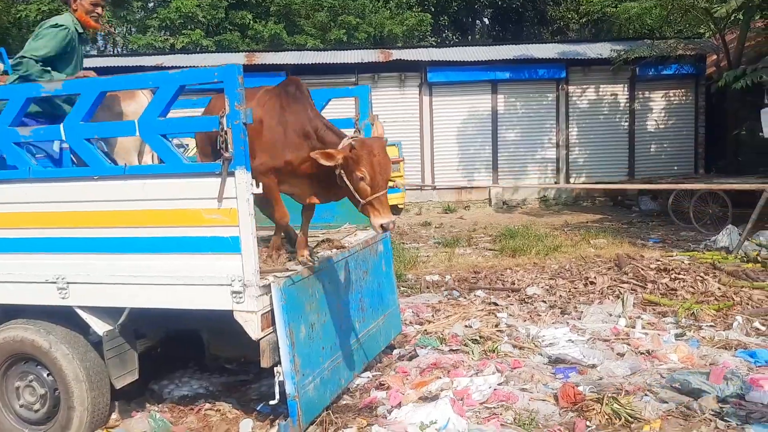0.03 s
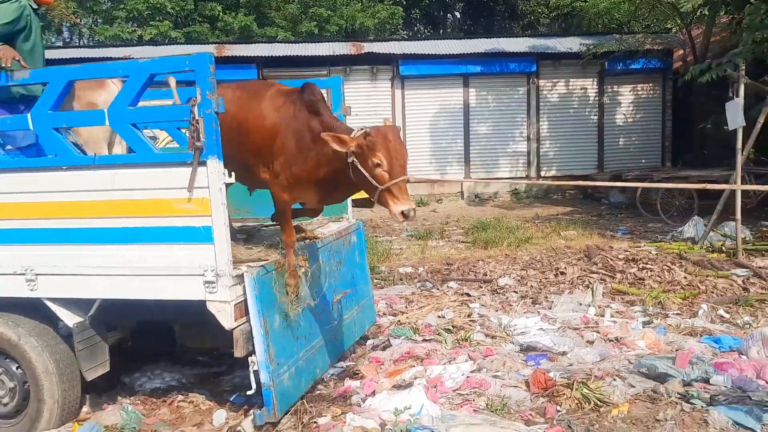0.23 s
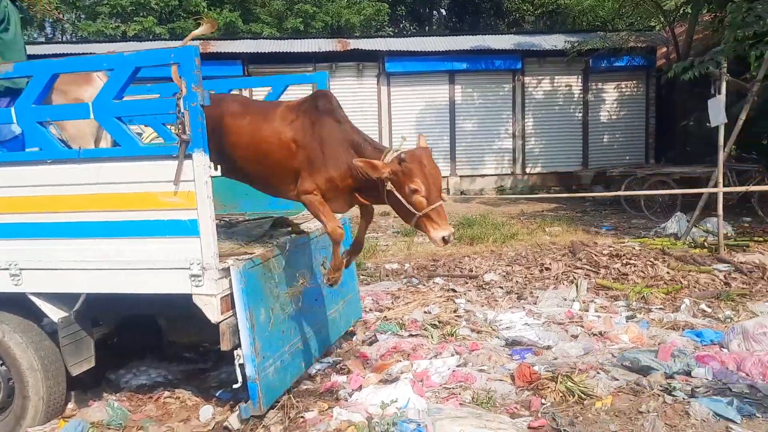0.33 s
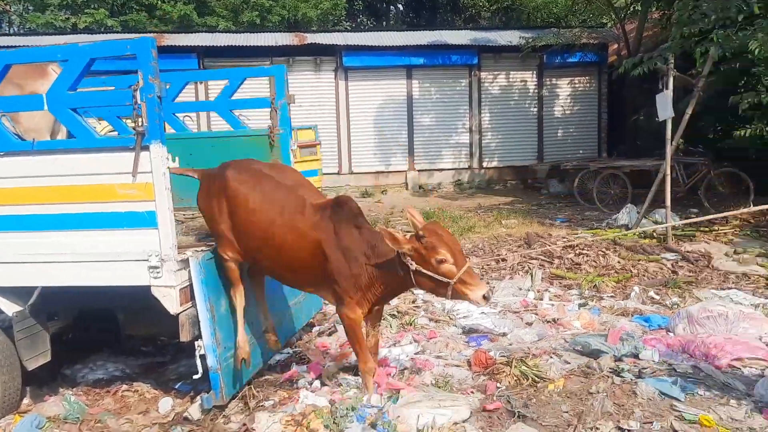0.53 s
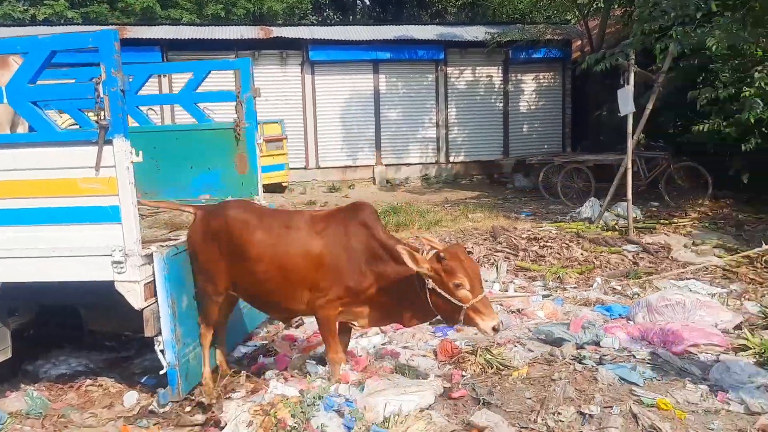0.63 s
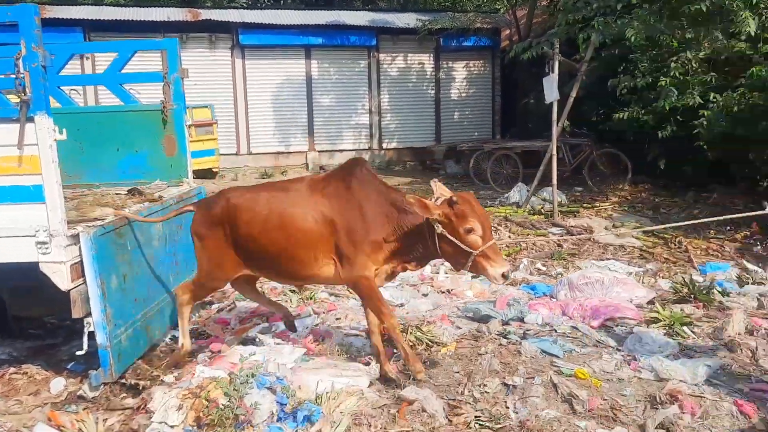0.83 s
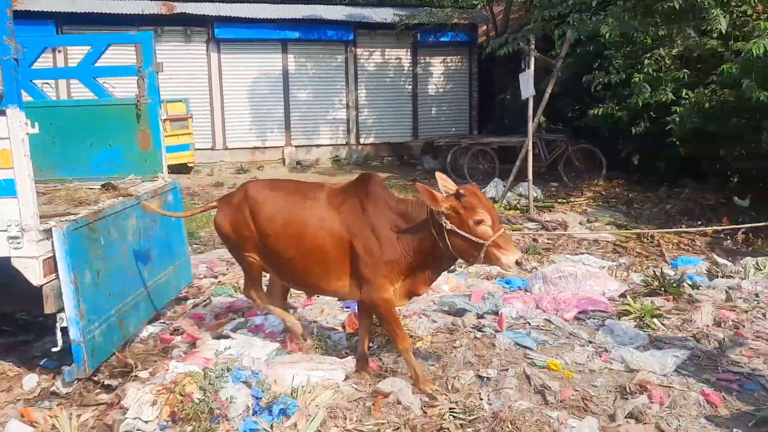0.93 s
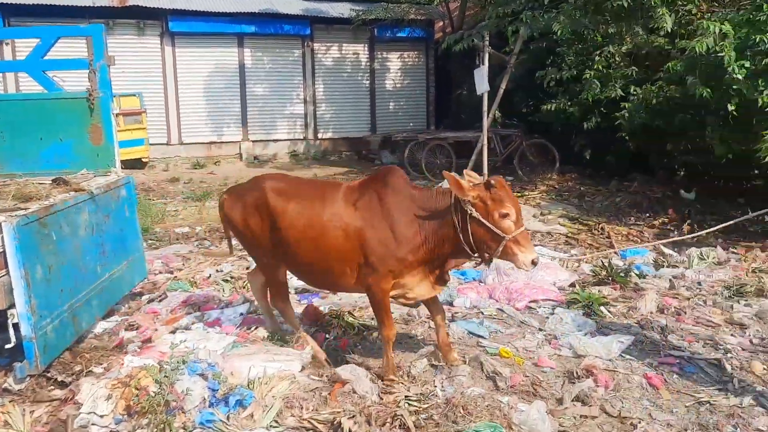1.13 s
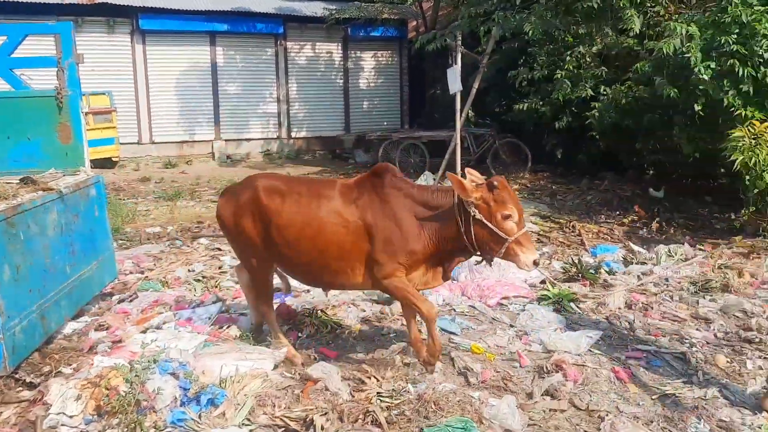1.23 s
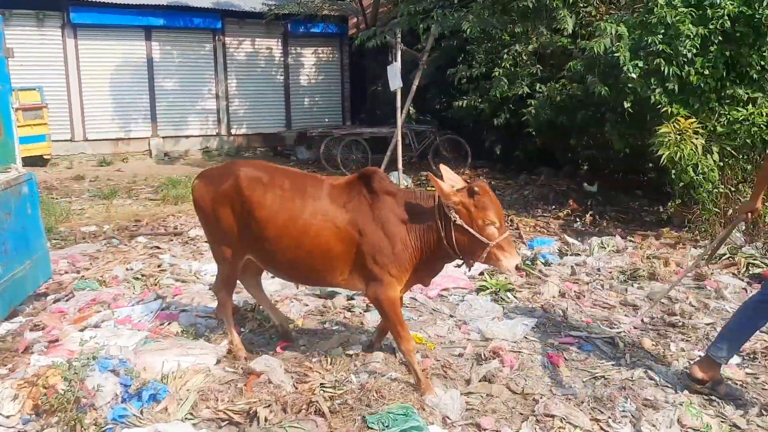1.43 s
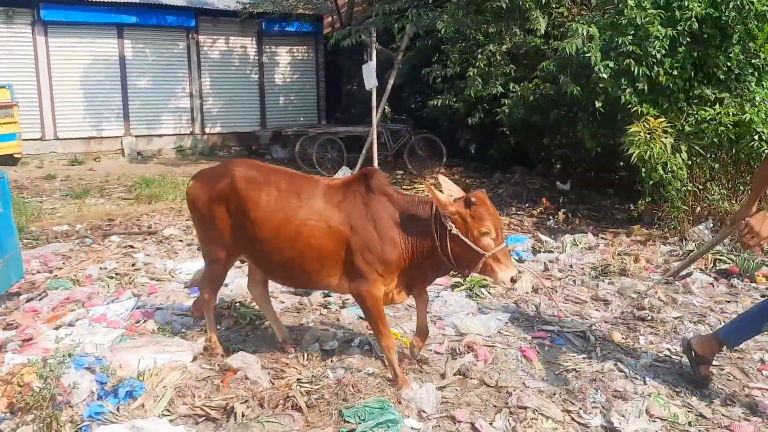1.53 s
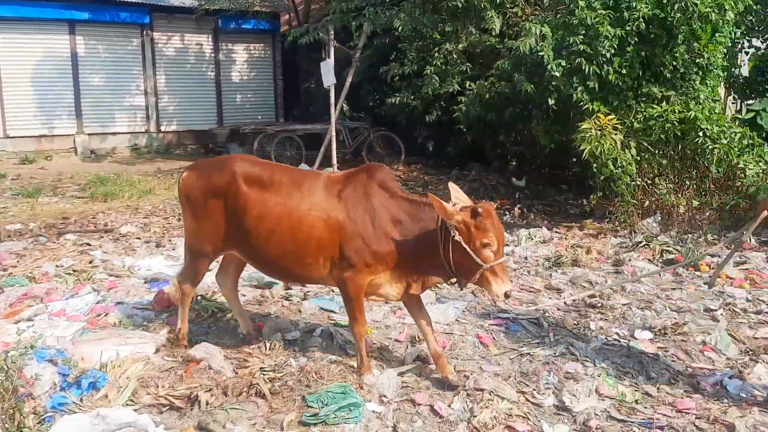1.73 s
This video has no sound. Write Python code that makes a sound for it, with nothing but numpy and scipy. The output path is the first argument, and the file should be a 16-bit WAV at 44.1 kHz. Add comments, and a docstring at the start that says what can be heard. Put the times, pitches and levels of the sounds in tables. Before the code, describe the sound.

Hooves bang and clatter on a steel truck bed, then crunch softly over dry litter.

```python
"""A cow jumps off a truck: its front hooves skid and bang on the steel bed, then its hind hooves
clatter against the hanging tailgate. Each blow makes the steel crack, boom and clang.
The cow's weight lands with low thumps, and it walks off over dry litter and earth with soft,
crunching steps. Behind it are a low outdoor rumble, a thin squeal at the start
and a few faint chirps at the end."""
import sys
import numpy as np
from scipy import signal
from scipy.fft import rfft, irfft, next_fast_len
from scipy.io import wavfile
from scipy.ndimage import map_coordinates

SR = 44100
rng = np.random.default_rng(int(sys.argv[2]) if len(sys.argv) > 2 else 0)


def put_to_file(sound):
    """Save the sound as 16-bit audio at rate SR, in the file named by the first command-line argument."""
    columns = np.atleast_2d(sound).T  # one column per channel
    safe = np.clip(columns, -1, 1)
    whole_steps = np.round(safe * 32767)
    wavfile.write(sys.argv[1], SR, whole_steps.astype(np.int16))


N = 79380  # 1.8 seconds


def amp(db):
    """Turn decibels into a number to multiply by."""
    return 10 ** (np.asarray(db) / 20)


def unit(x):
    """Scale a sound to an average (rms) level of 1."""
    return x / np.sqrt(np.mean(x ** 2) + 1e-20)


def along(points, hz):
    """Read between the rows of a frequency table, on a log scale."""
    frequencies, values = np.transpose(points)
    return np.interp(np.log(hz + 1), np.log(frequencies + 1), values)


def since(start):
    """Seconds since the start, zero before it."""
    return np.maximum(np.arange(N) / SR - start, 0)


def envelope(start, rise, fade):
    """Rise in a straight line, then fall 60 dB in each fade time."""
    return np.minimum(since(start) / rise, 1) * amp(-60 * since(start + rise) / fade)


def arch(start, length):
    """One rounded swell from 0 to 1 and back."""
    return np.sin(np.pi * np.minimum(since(start) / length, 1))


def wobble(rate):
    """A smooth curve through this many random points a second."""
    points = rng.standard_normal(int(N * rate / SR) + 4)
    return map_coordinates(points, [np.arange(N) * rate / SR])


def wavering_tone(hz, depth, rate):
    """A pure tone whose pitch wanders a little."""
    pitch = hz * (1 + depth * wobble(rate))
    return np.sin(2 * np.pi * np.cumsum(pitch) / SR)


def filtered(x, response):
    """Multiply each frequency in a sound by response(hz)."""
    size = next_fast_len(N + SR // 4)
    hz = np.fft.rfftfreq(size, 1 / SR)
    return irfft(rfft(x, size) * response(hz), size)[..., :N]


# Each row: frequency in Hz, how alike the two ears are (1 is the same).
EAR_LIKENESS = [(100, 0.98), (300, 1), (600, 0.99), (1200, 0.34), (2500, 0.59), (12000, 0.21)]
def spread(pair, spectrum):
    """Blend two unrelated signals into stereo at level 1; the spectrum sets the tone colour."""
    def response(hz):
        angle = np.arccos(np.clip(along(EAR_LIKENESS, hz), -1, 1)) / 2
        return amp(along(spectrum, hz)) * [np.cos(angle), np.sin(angle)]
    mid, side = filtered(pair, response)
    return unit(np.array([mid + side, mid - side]))


def noise(spectrum):
    """Stereo noise with the given tone colour."""
    return spread(rng.standard_normal((2, N)), spectrum)


# Each row: frequency in Hz, how much louder the left ear is in dB.
LEFT_BOOST = [(60, 0.1), (150, 1.5), (300, 2.8), (600, 3), (1200, 1.5), (2500, -2), (8000, 1.5),
              (13000, 0.5)]
def from_left(x, lead_s):
    """Sound from the left reaches that ear first, and louder at most frequencies."""
    sides = np.array([[.5], [-.5]])
    def response(hz):
        return amp(sides * along(LEFT_BOOST, hz)) * np.exp(2j * np.pi * hz * sides * lead_s)
    return filtered(x, response)


# Tone colours of the background. Each row: frequency in Hz, strength in dB.
RUMBLE_SPECTRUM = [(20, -43), (40, -2.5), (65, 0.5), (100, 1), (140, -3), (200, -14.5), (400, -45)]
MURMUR_SPECTRUM = [(110, -33), (180, -12), (250, -6), (340, -0.5), (430, -13), (600, -8.5), (1000, -16),
                   (1900, -21), (2550, -19.5), (2950, -23), (4900, -36), (9000, -44), (15500, -67)]
HISS_SPECTRUM = [(1000, -25), (2500, 9), (4800, 3.5), (7500, 0.5), (9500, -25), (13000, -17), (15500, -11)]
# How loud each one is. Each row: time in seconds, level in dB.
RUMBLE_LEVELS = [(0, -33.5), (1.0, -35.5), (1.45, -40.5), (1.8, -43.5)]
MURMUR_LEVELS = [(0, -39.5), (.5, -38.5), (1.1, -43.5), (1.4, -47), (1.66, -45.5), (1.73, -48.5), (1.8, -50)]
HISS_LEVELS = [(0, -53), (.5, -58), (.9, -54.5), (1.2, -54.5), (1.4, -61), (1.66, -55), (1.72, -62),
               (1.8, -61)]
def background():
    """A distant low rumble, a low, uneven murmur that is loudest in the first half second, and a faint high
    hiss."""
    def level(rows):
        return amp(np.interp(since(0), *np.transpose(rows)))
    rumble = level(RUMBLE_LEVELS) * noise(RUMBLE_SPECTRUM)
    murmur = level(MURMUR_LEVELS) * amp(1.6 * wobble(23.7)) * noise(MURMUR_SPECTRUM)
    hiss = level(HISS_LEVELS) * noise(HISS_SPECTRUM)
    return rumble + murmur + hiss


# Each row: start in seconds, level in dB, length in seconds, pitch in Hz.
PEEPS = [(1.54, -48, 0.013, 2630), (1.63, -55, 0.023, 2470), (1.646, -49.5, .026, 2610),
         (1.68, -59, .032, 2540)]
def chirps():
    """Short, wavering peeps far off."""
    return sum(amp(db) * arch(start, length) * wavering_tone(hz, depth=0.0147, rate=250)
               for start, db, length, hz in PEEPS)


# Each row: start in seconds, level in dB, length in seconds.
SQUEAL_SWELLS = [(-.01, -46, .075), (0.082, -46.5, 0.1)]
# Each row: pitch in Hz, strength in dB.
SQUEAL_PITCHES = [(2940, 5.5), (3365, -4.5)]
def squeal():
    """Two thin, slightly unsteady tones that swell twice."""
    swell = sum(amp(db) * np.abs(arch(start, length)) ** .5 for start, db, length in SQUEAL_SWELLS)
    tones = sum(amp(db) * wavering_tone(hz, depth=0.0029, rate=65) for hz, db in SQUEAL_PITCHES)
    return swell * tones


# Each row: start in seconds, level in dB, rise and fade times in seconds.
HOOF_FALLS = [(.56, -42, .025, 0.19), (.993, -41.5, 0.0066, 0.19), (1.262, -36.5, 0.0084, 0.74),
              (1.538, -39.5, 0.0083, 0.54)]
# Each row: frequency in Hz, strength in dB.
EARTH_SPECTRUM = [(60, -15), (200, -21), (330, -1), (650, 3.5), (1000, -7.5), (2500, -20.5), (6000, -35)]
def steps():
    """Hooves land on soft earth with dull, lumpy scuffs."""
    return sum(amp(db + 2.3 * wobble(91)) * envelope(start, rise, fade) * noise(EARTH_SPECTRUM)
               for start, db, rise, fade in HOOF_FALLS)


# Each row: start in seconds, level in dB, rise and fade times in seconds.
HOOF_PRESSES = [(.142, -39.5, 0.077, 0.93), (0.38, -35, .008, 0.16), (.548, -39.5, 0.034, 1),
                (0.699, -30.5, 0.032, 0.1), (.795, -38.5, 0.02, 0.18), (0.991, -41, 0.0028, 0.26),
                (1.124, -38, 0.019, 0.21), (1.25, -49.5, 0.037, 0.35), (1.44, -51.5, 0.02, 1),
                (1.524, -54, 0.014, 0.38), (1.6, -52, 0.024, 0.43)]
# Each row: frequency in Hz, strength in dB.
LITTER_SPECTRUM = [(300, -24), (1200, 10), (2600, 9), (4500, 7), (7500, 5), (9500, -2), (13000, 2.5),
                   (15500, -2.5)]
def litter(crackles_per_s=1100, crackle_share=0.46):
    """Dry litter and plastic crackle and rustle as each hoof presses in."""
    energy = sum((amp(db) * envelope(start, rise, fade)) ** 2 for start, db, rise, fade in HOOF_PRESSES)
    clicks = rng.standard_normal((2, N)) * (rng.random(N) < crackles_per_s / SR)
    crackle = np.sqrt(crackle_share) * spread(clicks, LITTER_SPECTRUM)
    rustle = np.sqrt(1 - crackle_share) * noise(LITTER_SPECTRUM)
    return np.sqrt(energy) * (crackle + rustle)


# Each row: start in seconds, level in dB.
STALK_SNAPS = [(.381, -61), (0.995, -38), (1.018, -39.5), (1.467, -48), (1.5243, -40.5), (1.532, -39.5)]
# Each row: frequency in Hz, strength in dB.
SNAP_SPECTRUM = [(400, -15), (1500, 7), (3800, 22), (5500, -7), (9000, -14.5), (15000, -22)]
def stalks():
    """Single dry stalks break underfoot with short, bright ticks."""
    ticks = sum(amp(db) * envelope(start, rise=0.00055, fade=0.019) for start, db in STALK_SNAPS)
    return ticks * noise(SNAP_SPECTRUM)


# Each row: start in seconds, level in dB, rise and fade times in seconds.
HOOF_SCRAPES = [(.155, -27, 0.007, 0.21), (0.179, -27.5, 0.0046, 0.31), (.218, -23, 0.013, 0.22)]
# Each row: frequency in Hz, strength in dB.
SKID_SPECTRUM = [(150, -18), (400, -9), (570, 8.5), (760, -2), (1080, 4), (1320, 2.5), (1480, -6),
                 (1670, -0.5), (2000, -11.5), (5000, -27), (14000, -32.5)]
def skid(slips_per_s=430, unevenness=0.28):
    """Before the jump, a hoof sticks and slips on the steel bed."""
    slip_count = np.cumsum(slips_per_s * np.exp(unevenness * wobble(200))) / SR
    slips = np.exp(-5 * (slip_count % 1)) * rng.standard_normal((2, N))  # one noise burst per slip
    level = sum(amp(db) * envelope(start, rise, fade) for start, db, rise, fade in HOOF_SCRAPES)
    return level * spread(slips, SKID_SPECTRUM)


# Each row: start in seconds, level in dB, pitch in Hz, rise and fade times in seconds.
WEIGHT_THUMPS = [(.006, -21, 189.7, 0.0086, .07), (.07, -21, 206, 0.0062, 0.054),
                 (0.2787, -4.5, 120.6, 0.015, .12), (0.469, -16, 127.5, .012, 0.14),
                 (0.6581, -1.5, 140.4, 0.011, 0.059), (.74, -16, 99.1, 0.011, .35),
                 (0.894, -26.5, 121, 0.0091, 0.16), (.94, -26.5, 111, 0.0052, 0.24),
                 (1.04, -25.5, 105, .008, 0.049), (1.186, -27.5, 106, 0.006, 0.056)]
def thumps():
    """The cow's weight shifts and comes down, each time with a low tone that dies quickly."""
    return sum(amp(db) * envelope(start, rise, fade) * np.sin(2 * np.pi * hz * since(start))
               for start, db, hz, rise, fade in WEIGHT_THUMPS)


def ringing(blows, tones, boom_below_hz=320, clang_above_hz=530):
    """Every blow adds energy to a steel panel's own tones, and each dies at its own speed."""
    out = np.zeros(N)
    for hz, tone_db, fade in tones:
        energy = np.zeros(N)
        for start, clang_db, rise, boom_db, _ in blows:
            blow_db = np.interp(hz, [boom_below_hz, clang_above_hz], [boom_db, clang_db])
            energy += (amp(blow_db) * envelope(start, rise, fade)) ** 2
        phase = 2 * np.pi * (hz * since(0) + rng.random())
        waver = 0.45 * wobble(35.63)
        out += amp(tone_db) * np.sqrt(energy) * np.sin(phase + waver)
    return out


def clangs(blows, spectrum, fades, punch_db=5.5, punch_fade_s=0.13):
    """Struck steel has so many close tones that they blur into a fading wash of noise."""
    out = np.zeros((2, N))
    for start, clang_db, rise, _, _ in blows:
        hz, times, bands = signal.stft(noise(spectrum), SR, nperseg=256)  # split up by frequency
        decay = amp(-60 * np.maximum(times - start, 0) / along(fades, hz)[:, None])
        wash = signal.istft(bands * decay, SR, nperseg=256)[1][:, :N]
        age = since(start)
        punch = 1 + amp(punch_db - 60 * age / punch_fade_s)  # the loud first moment
        out += amp(clang_db) * np.minimum(age / rise, 1) * punch * wash
    return out


# Each row: frequency in Hz, strength in dB.
CRACK_SPECTRUM = [(300, 7.5), (1200, -15), (2800, 9), (4200, -4), (6500, -1.5), (9500, -12), (13500, -5.5),
                  (15500, -23)]
def cracks(blows, fade_s=0.035):
    """Hard hoof meets steel with a sharp burst of noise."""
    return sum(amp(crack_db) * envelope(start, rise / 2, fade_s) * noise(CRACK_SPECTRUM)
               for start, _, rise, _, crack_db in blows)


# Each row: start in seconds, clang in dB, rise time in seconds, boom in dB, crack in dB.
FRONT_HOOF_BLOWS = [(0.0, -44.5, 0.0043, -32.5, -66), (.07, -56, .006, -38, -70),
                    (.194, -39, 0.009, -27, -77), (.212, -26, 0.0025, -17, -24),
                    (.243, -21, 0.0081, -59, -33), (.2785, -17.5, 0.001, -22.5, -16),
                    (.294, -21.5, 0.003, -13.5, -47)]
# The tones the bed rings with. Each row: pitch in Hz, strength in dB, fade time in seconds.
BED_TONES = [(126.8, -12, 1.0), (199.76, 0.5, 0.78), (294, -10, 1), (402.8, -11, 1), (457.7, -13.5, 0.92),
             (468, -7, 0.48), (538, -6, 0.34), (574, 2.5, 0.12), (636, -1, 0.15), (937, -2, 0.25),
             (940, -15, 0.12), (1076, -12, 0.21), (1206, -8, 0.33), (1670, -9, 0.18)]
# The colour of its clang. Each row: frequency in Hz, strength in dB.
BED_SPECTRUM = [(40, -43), (90, -10), (220, 3.5), (400, -0.5), (600, 1), (760, -3.5), (1000, -2),
                (1500, -12), (2000, -17.5), (2900, -21.5), (4500, -31), (9000, -40), (14000, -39)]
# How long its clang lasts. Each row: frequency in Hz, fade time in seconds.
BED_FADES = [(100, 1), (400, 0.87), (1000, 0.55), (3000, 0.85), (10000, 0.15)]
def truck_bed():
    """The front hooves bang on the steel floor of the truck."""
    clang = clangs(FRONT_HOOF_BLOWS, BED_SPECTRUM, BED_FADES)
    return clang + cracks(FRONT_HOOF_BLOWS) + ringing(FRONT_HOOF_BLOWS, BED_TONES)


# Each row: start in seconds, clang in dB, rise time in seconds, boom in dB, crack in dB.
TAILGATE_BLOWS = [(.66, -19.5, 0.0068, -17.5, -28.5), (.708, -21.5, 0.014, -26, -34),
                  (.729, -20.5, 0.0016, -14.5, -32), (.745, -26, 0.0017, -17, -38),
                  (.836, -43, 0.0017, -17, -62), (.995, -60, .01, -35.5, -85)]
# The tones the tailgate rings with. Each row: pitch in Hz, strength in dB, fade time in seconds.
GATE_TONES = [(102.7, -5, 0.42), (143.5, -7, 0.21), (221, -9.5, 0.54), (314, 0.5, 0.21), (352.6, -2, 0.2),
              (438, -5, 0.23), (473, -5.5, 0.19), (566, -8.5, 0.35), (646, -10.5, .45), (694, -5.5, 0.22),
              (923, -5, 0.28), (1093, -8.5, .3), (1220, -0.5, 0.11), (2864, -13.5, 0.24)]
# The colour of its clang. Each row: frequency in Hz, strength in dB.
GATE_SPECTRUM = [(40, -39), (90, 6), (220, 4), (400, 1), (650, -2), (800, -4.5), (1200, -5), (1900, -10.5),
                 (2700, -11.5), (3600, -18), (5500, -23), (9000, -39.5), (14000, -40)]
# How long its clang lasts. Each row: frequency in Hz, fade time in seconds.
GATE_FADES = [(100, 0.93), (400, 0.91), (1000, 0.63), (3000, 0.49), (10000, 0.54)]
def tailgate():
    """The hind hooves clatter against the hanging tailgate, which then swings back."""
    clang = clangs(TAILGATE_BLOWS, GATE_SPECTRUM, GATE_FADES)
    return clang + cracks(TAILGATE_BLOWS) + ringing(TAILGATE_BLOWS, GATE_TONES)


def scene():
    """The truck and the yard around it, both to the left."""
    yard = background() + chirps() + steps() + litter() + stalks()
    truck = squeal() + skid() + thumps() + truck_bed() + tailgate()
    return from_left(yard, lead_s=0.0004336) + from_left(truck, lead_s=0.00029)


def record(dry, low_cut_hz=77, top_hz=15750):
    """The microphone loses the deepest bass, rounds off loud peaks and cuts the highest treble."""
    thinned = filtered(dry, lambda hz: hz ** 2 / np.sqrt(hz ** 4 + low_cut_hz ** 4))
    rounded = thinned / (1 + np.abs(thinned) ** 8) ** (1 / 8)
    return filtered(rounded, lambda hz: (hz < top_hz) / np.sqrt(1 + (hz / top_hz) ** 30))


dry = scene()
out = record(dry)
put_to_file(out)
```